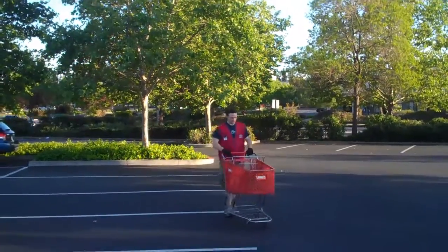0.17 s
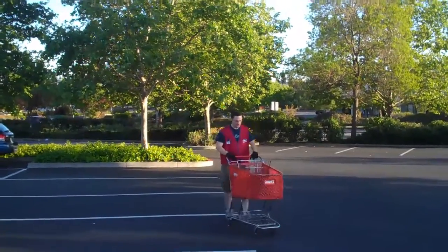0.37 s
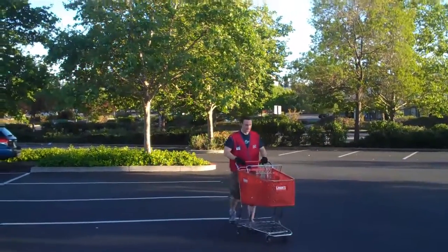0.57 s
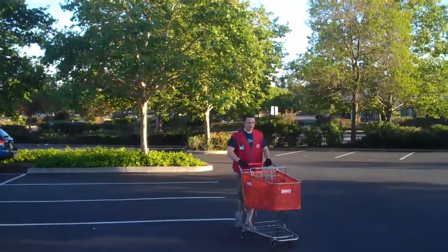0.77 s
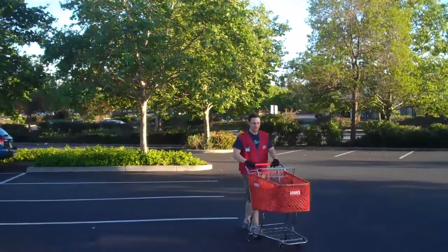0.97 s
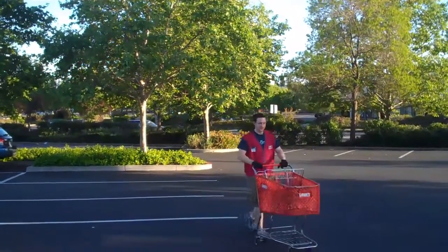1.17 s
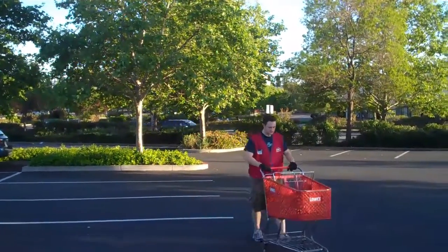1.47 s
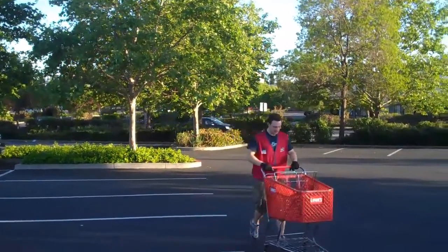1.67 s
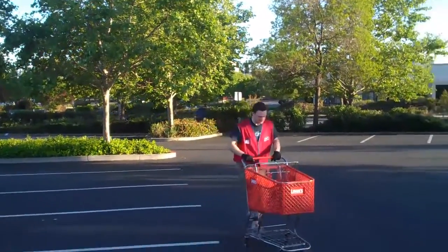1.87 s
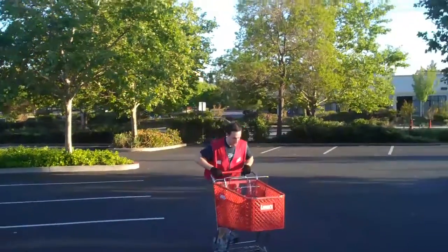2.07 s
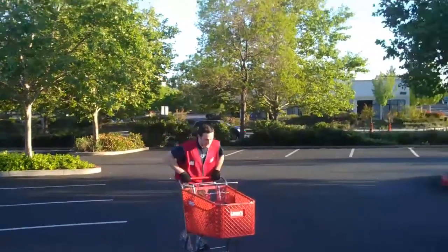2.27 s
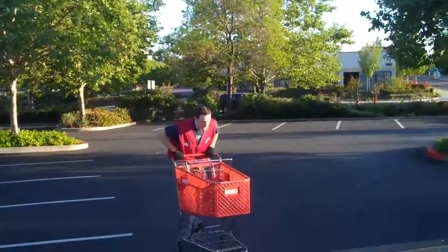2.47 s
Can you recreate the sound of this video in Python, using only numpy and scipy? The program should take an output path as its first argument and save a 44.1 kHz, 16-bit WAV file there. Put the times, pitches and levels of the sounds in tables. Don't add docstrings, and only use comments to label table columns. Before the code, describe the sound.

A shopping cart rattles over asphalt throughout, its loose metal jolting in dense, irregular bright clinks. A faint distant engine drones until about 1 second, over low, fading traffic. Tiny high axle chirps appear from 1.2 to 2.1 seconds, with a pebble snap at 1.7. From 1.9 the wheels roar louder and the plastic basket hums; a low knock rises at 2.3. Open outdoor car park, cart approaching.

```python
import sys
import numpy as np
from scipy import signal
from scipy.fft import rfft, irfft
from scipy.io import wavfile
from scipy.ndimage import uniform_filter1d

SR = 44100
rng = np.random.default_rng(int(sys.argv[2]) if len(sys.argv) > 2 else 0)


def invert_db(x):
    u = np.asarray(x, float) / 20
    return 10 ** u


def wav_record(signal):
    frames = np.transpose(np.atleast_2d(signal))
    bounded = np.clip(frames, -1, 1)
    quanta = np.round(bounded * 32767).astype(np.int16)
    wavfile.write(sys.argv[1], SR, quanta)


N = 115983
T = np.arange(N) / SR
RUMBLE_FADE_DB_PER_S = -1.5


def evened(x):
    return x / np.sqrt(np.mean(x ** 2) + 1e-20)


def curve(points):
    t_s, level_db = np.transpose(points)
    return invert_db(np.interp(T, t_s, level_db))


def coloured(x, points, edge_db=-40):
    f_hz, level_db = np.transpose(points)
    hz = np.fft.rfftfreq(x.shape[-1], 1 / SR) + 1
    octaves_below = np.maximum(np.log2(f_hz[0] / hz), 0)
    octaves_above = np.maximum(np.log2(hz / f_hz[-1]), 0)
    gain_db = np.interp(np.log(hz), np.log(f_hz), level_db) + edge_db * (octaves_below + octaves_above)
    return irfft(rfft(x) * invert_db(gain_db), x.shape[-1])


def ring(x, hz, t60_s):
    radius = 10 ** (-3 / (t60_s * SR))
    angle = 2 * np.pi * hz / SR
    return signal.lfilter([np.sin(angle)], [1, -2 * radius * np.cos(angle), radius ** 2], x)


def level_ring(x, hz, t60_s):
    return ring(x, hz, t60_s) * np.sqrt(28 / (t60_s * SR))


def taps(per_s, spread_db):
    chance, sign, size = rng.random((3, 2, N))
    return (chance < per_s / SR) * np.sign(sign - .5) * invert_db(-spread_db * np.log(size + 0.022))


def wobble(time_s):
    noise = uniform_filter1d(rng.standard_normal(N), size=200)
    return evened(signal.lfilter([1], [1, -np.exp(-1 / (time_s * SR))], noise))


def add(mix, t_s, sound):
    part = mix[..., round(t_s * SR):][..., :sound.shape[-1]]
    part += sound[..., :part.shape[-1]]


def blip(t_s, level_db, hz, length_s):
    t = T - t_s
    return invert_db(level_db) * np.exp(-(t / length_s * 2) ** 2) * np.cos(2 * np.pi * hz * t)


def traffic_rumble():
    # f/Hz, level/dB
    rumble_colour = [(11, -42), (30, -17), (66, 1), (125, -2.5), (184, -1.5), (260, -3.5), (330, -15.5),
                     (430, -61), (730, -120)]
    noise = rng.standard_normal((2, N))
    return evened(coloured(noise, rumble_colour, edge_db=-25)) * invert_db(-38.5 + RUMBLE_FADE_DB_PER_S * T)


def engine_drone():
    # t/s, level/dB
    drone_level = [(0, -39.5), (.42, -39), (.52, -59), (.67, -51), (.74, -37.5), (.81, -51), (.87, -50),
                   (.95, -54), (1.3, -62)]
    centre_hz, drift_hz, overtone_db, overtone_fade_db_per_s, end_s = 113.5, .7, -3, -51, 1.3
    drift = evened(signal.lfilter([1], [1, -np.exp(-5 / SR)], rng.standard_normal(N)))
    phase = 2 * np.pi * np.cumsum(centre_hz + drift_hz * drift) / SR
    overtone = invert_db(overtone_db + overtone_fade_db_per_s * T) * np.sin(2 * phase)
    return np.sqrt(2) * (np.sin(phase) + overtone) * curve(drone_level) * (T < end_s)


def traffic_hum():
    hum_hz, width_hz, level_db = 263, 18, -52
    noise = rng.standard_normal((2, N))
    hum = evened(ring(noise, hum_hz, np.log(1000) / np.pi / width_hz))
    return hum * invert_db(level_db + RUMBLE_FADE_DB_PER_S * T)


def wheels():
    # t/s, level/dB
    roll_level = [(0.0, -41.5), (1.06, -40.5), (1.71, -39.5), (1.95, -38), (2.2, -37.5), (2.63, -38.5)]
    # f/Hz, level/dB
    roll_colour = [(200, -41), (350, -7), (550, -10.5), (700, -10), (950, -2.5), (1250, -7.5), (1700, -5),
                   (3500, -16)]
    roar = evened(coloured(rng.standard_normal((2, N)), roll_colour))
    return roar * curve(roll_level) * invert_db(1.5 + 0.38 * wobble(time_s=0.014))


def basket_hum():
    # f/Hz, level/dB, t60/s
    basket_modes = [(463, -7, .15), (655, -1, .09), (820, 0, .1), (890, -1, .1), (990, -1, .07),
                    (1095, -4, .08)]
    # t/s, level/dB
    hum_level = [(0, -55.5), (.9, -52), (1.1, -47.5), (1.3, -53), (1.82, -48), (1.93, -43.5), (2.1, -44.5),
                 (2.17, -41.5), (2.24, -42.5), (2.3, -40), (2.46, -39), (2.63, -43.5)]
    shaking = rng.standard_normal((2, N))
    hum = sum(invert_db(db) * evened(ring(shaking, hz, t60_s)) for hz, db, t60_s in basket_modes)
    return evened(hum) * curve(hum_level)


def axle_squeaks():
    # t/s, level/dB, f/Hz
    chirps = [
        (1.197, -35.5, 10430),
        (1.356, -32.5, 10800),
        (1.48, -42, 10700),
        (1.769, -44, 10800),
        (2.103, -36.5, 11000),
    ]
    return sum(blip(t_s, db, hz, .0043) for t_s, db, hz in chirps)


def pebble_snap():
    # f/Hz, level/dB, length/s, delay/s
    snap = [
        (7200, -19, .0006, 0),
        (12500, -31, .0003, 0),
        (3800, -8, .0006, .0007),
    ]
    snap_s = 1.7245
    return sum(blip(snap_s + delay_s, db, hz, length_s) for hz, db, length_s, delay_s in snap)


def low_knock():
    # t/s, level/dB, f/Hz
    knock = [
        (2.277, -31, 360),
        (2.286, -32, 600),
        (2.3, -30, 1020),
    ]
    return sum(blip(t_s, db, hz, .016) for t_s, db, hz in knock)


def wire_pings():
    # t/s, level/dB, f/Hz
    pings = [(.0255, -21, 3600), (.1012, -20, 4700), (.146, -24, 4990), (.2255, -23, 3800),
             (.2262, -24, 5500), (.628, -22, 3850), (.746, -21, 5060), (.3725, -24, 5350),
             (.4195, -24, 3900), (.4535, -21, 3750), (.8415, -21, 3400), (.9555, -19, 3550),
             (1.0325, -21, 3600), (1.1355, -21, 3830), (1.178, -22, 3740), (1.2685, -23, 3300),
             (1.277, -22, 3000), (.182, -22, 5070), (.21, -24, 4400), (.276, -24, 3080), (1.428, -22, 5120),
             (2.254, -23, 3300), (2.322, -21, 4300), (2.409, -24, 2830)]
    return sum(blip(t_s, db, hz, .0016) for t_s, db, hz in pings)


def small_hits():
    hits = axle_squeaks() + pebble_snap() + low_knock() + wire_pings()
    return np.array([hits, -hits])


def jolts():
    # t/s, strength/dB, loudest wire f/Hz, rattle
    # length/s
    bumps = [(0.01, -20, 3470, 0.036), (0.0233, -14, 2900, 0.049), (0.04, -23, 3660, 0.045),
             (0.065, -19, 5060, 0.022), (0.108, -12.5, 4900, 0.014), (0.14, -21, 4930, 0.04),
             (0.168, -19, 5260, 0.025), (0.185, -24, 6500, 0.015), (0.334, -24.5, 3930, 0.04),
             (0.48, -20, 3630, 0.055), (0.864, -19.5, 3530, 0.055), (0.882, -19, 3340, 0.04),
             (1.043, -16.5, 3600, 0.07), (1.062, -19.5, 3460, 0.04), (1.084, -24, 4630, 0.04),
             (1.277, -21, 3000, 0.037), (0.103, -19.5, 5130, 0.038), (0.225, -15.5, 5530, 0.11),
             (0.246, -14.5, 3530, 0.037), (0.297, -17.5, 3550, 0.086), (0.373, -19, 5400, 0.085),
             (0.3965, -17, 5530, 0.066), (0.4206, -16.5, 3830, 0.058), (0.45, -16.5, 3720, 0.15),
             (0.503, -18, 3770, 0.11), (0.582, -16, 2960, 0.058), (0.624, -18, 3820, 0.097),
             (0.665, -21, 3620, 0.061), (0.709, -25, 3550, 0.16), (0.744, -23, 4900, 0.11),
             (0.777, -20, 3740, 0.19), (0.813, -18.5, 3740, 0.082), (0.838, -12.5, 3360, 0.086),
             (0.9355, -15.5, 3640, 0.063), (0.954, -16, 3740, 0.1), (0.977, -22, 3560, 0.1),
             (1.031, -16, 3630, 0.11), (1.133, -17.5, 3840, 0.099), (1.179, -14.5, 3740, 0.056),
             (1.215, -21, 3620, 0.074), (1.241, -22, 3090, 0.061), (1.267, -14.5, 3000, 0.064),
             (1.325, -21, 5030, 0.06), (1.3464, -18, 3800, 0.073), (1.395, -19.5, 4040, 0.056),
                  (1.415, -15, 5360, 0.03), (1.4656, -21.5, 5300, 0.044), (1.493, -18, 3790, 0.063),
                  (1.519, -16, 3940, 0.035), (1.534, -15.5, 3630, 0.1), (1.6006, -18.5, 1760, 0.066),
                  (1.648, -19, 5430, 0.06), (1.692, -16.5, 2670, 0.066), (1.745, -13, 3860, 0.062),
                  (1.783, -16, 3060, 0.071), (1.817, -21, 4400, 0.055), (1.85, -21, 6300, 0.06),
                  (1.8646, -11, 3520, 0.048), (1.871, -17.5, 2500, 0.053), (1.885, -21.5, 2510, 0.059),
                  (1.9894, -22, 2350, 0.039), (2.035, -22, 2940, 0.072), (2.053, -20, 1700, 0.076),
                  (2.0906, -20, 4160, 0.065), (2.116, -21, 3980, 0.11), (2.184, -19, 4000, 0.03),
                  (2.1975, -17.5, 2520, 0.022), (2.22, -22, 2550, 0.047), (2.243, -18, 3080, 0.045),
                  (2.283, -22, 2270, 0.025), (2.303, -18.5, 3040, 0.03), (2.307, -14.5, 3930, 0.044),
                  (2.311, -17, 4640, 0.037), (2.352, -19.5, 4300, 0.034), (2.399, -24, 4800, 0.037),
                  (2.517, -23, 4460, 0.03), (2.527, -17, 5400, 0.038), (2.543, -21, 2980, 0.051),
                  (2.565, -20, 5000, 0.027), (2.586, -22, 3730, 0.048)]
    bump_db, rise_s, first_knock_db = -13.5, .0012, 20
    crack_db, crack_s = 3, .0089
    ring_db, ring_t60_s = -8, .028
    power, rung = np.zeros(N), np.zeros((2, N))
    t = T[:SR // 3]
    knocks = evened(taps(per_s=2000, spread_db=1.5))
    for t_s, db, hz, length_s in bumps:
        level_db = db + bump_db - 28.7 * t / length_s + crack_db * np.exp(-t / crack_s)
        burst = np.minimum(t / rise_s, 1) * invert_db(level_db)
        add(power, t_s - rise_s, burst ** 2)
        strike = knocks[:, round(t_s * SR):][:, :len(t)]
        strike = strike * burst[:strike.shape[1]]
        strike[:, 0] += invert_db(db + bump_db + first_knock_db)
        add(rung, t_s, invert_db(ring_db) * level_ring(strike, hz, ring_t60_s))
    return power, rung


def joint_ticks():
    # f/Hz, level/dB
    clatter = [(410, -12.5), (700, -65), (1310, -15), (1700, -18), (2950, -4.5), (3700, -4.5), (4410, -3),
               (8240, -10), (13900, -29.5)]
    joints, puff_db, puff_t60_s, note_db, note_t60_s = 24, -8.5, .0019, -7, .0038
    t = T[:400]
    note_hz = np.geomspace(1820, 11000, joints)[:, None, None]
    puff = rng.standard_normal((joints, 1, len(t))) * invert_db(puff_db - 60 * t / puff_t60_s)
    note = np.sin(2 * np.pi * note_hz * t) * invert_db(note_db - 60 * t / note_t60_s)
    tick_shapes = (t == 0) + puff + note
    train = taps(per_s=4000, spread_db=1)
    joint = rng.integers(0, joints, N)
    hits = sum(signal.oaconvolve(train * (joint == k), shape)[:, :N] for k, shape in enumerate(tick_shapes))
    return evened(coloured(hits, clatter))


def ringing_wires(force):
    # f/Hz, level/dB, t60/s
    wires = [(1645, -3, 0.024), (2000, -1, 0.013), (2520, -7, 0.081), (3160, -5, 0.031), (3550, -5, 0.1),
             (3740, -3, 0.04), (4200, -9, 0.18), (5230, -2.5, 0.04), (6087, -3, 0.025), (6800, -3.5, 0.029),
             (8100, -34, 0.039), (8150, -9.5, 0.0065), (8440, -19, 0.069), (9850, -32, 0.023)]
    total = np.zeros((2, N))
    for hz, db, t60_s in wires:
        tapped = evened(taps(per_s=500, spread_db=4.5)) * force
        total += invert_db(db) * level_ring(tapped, hz, t60_s)
    return total


def frame():
    # t/s, level/dB
    shake_level = [(0, -33), (.5, -34), (.56, -38), (.62, -33), (1.04, -33), (1.11, -39.5), (1.17, -33),
                   (1.7, -35.5), (1.96, -40), (2.1, -35.5), (2.38, -37.5), (2.46, -37.5), (2.63, -36.5)]
    shaking = curve(shake_level) * invert_db(-5 + 1.5 * wobble(time_s=0.0048))
    bump_power, rung = jolts()
    force = np.sqrt(shaking ** 2 + bump_power)
    return invert_db(0.5) * joint_ticks() * force + invert_db(-11) * ringing_wires(force) + rung


def scene():
    # f/Hz, side minus mid level/dB
    side_share = [(90, -25), (280, -16.5), (610, -12), (1320, -10.5), (2870, -9), (6220, -7.5),
                  (10000, -7.5), (13500, -2.5)]
    # f/Hz, left minus right level/dB
    lean = [(60, 1.5), (230, 1.5), (900, 2), (3480, 1.0), (13500, 0.5)]
    background = traffic_rumble() + engine_drone() + traffic_hum()
    mid, side = background + wheels() + basket_hum() + small_hits() + frame()
    side = coloured(side, side_share, edge_db=-4) * invert_db(-2.5)
    left = coloured(mid, [(hz, db / 2) for hz, db in lean], edge_db=4) + side
    right = coloured(mid, [(hz, -db / 2) for hz, db in lean], edge_db=1) - side
    return np.array([left, right])


def low_pass(x):
    return signal.sosfilt(signal.butter(12, 14080, fs=SR, output="sos"), x)


def record(dry):
    # f/Hz, level/dB
    mic_top = [(9000, 0), (11500, 1.5), (13000, -1), (14500, 4)]
    mix = coloured(dry, mic_top, edge_db=0)
    return low_pass(mix)


dry = scene()
out = record(dry)
wav_record(out)
```